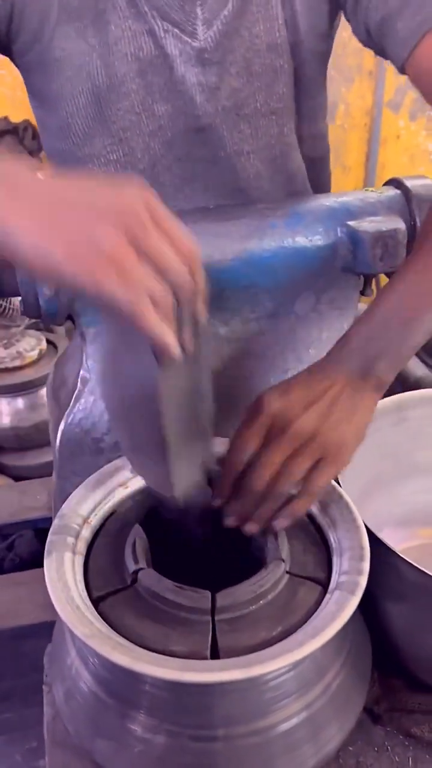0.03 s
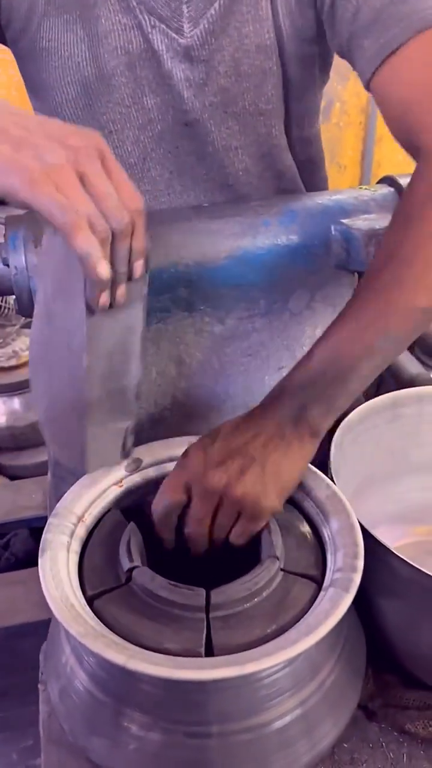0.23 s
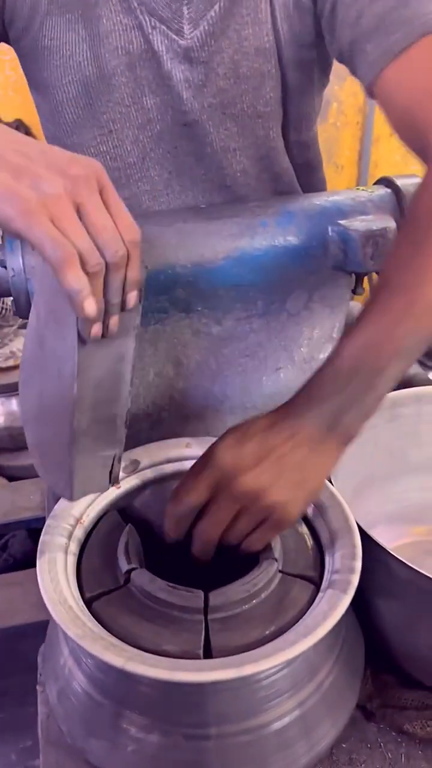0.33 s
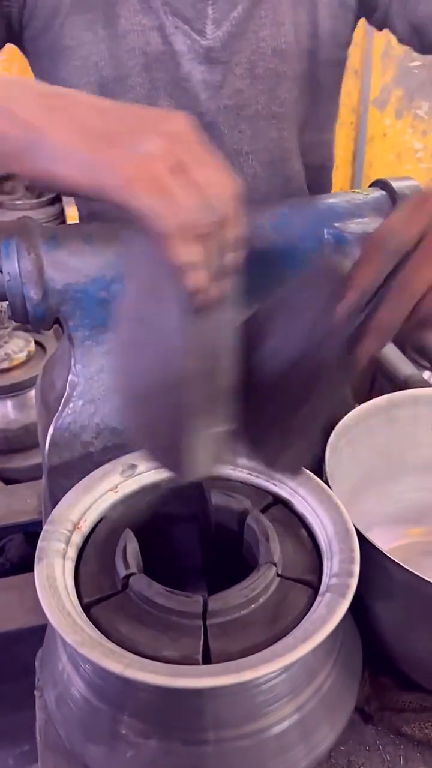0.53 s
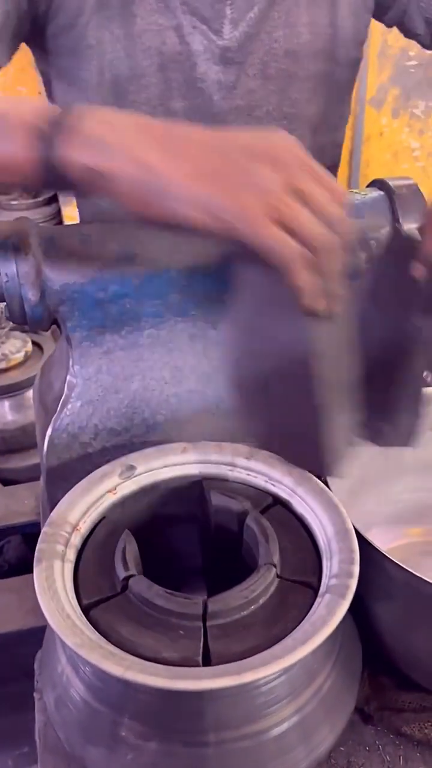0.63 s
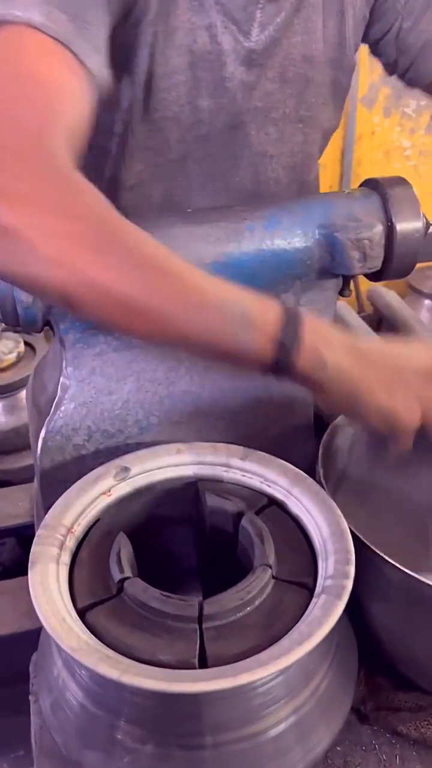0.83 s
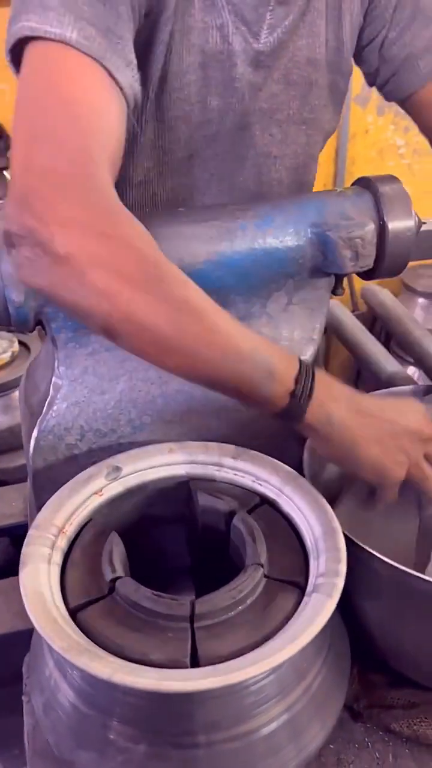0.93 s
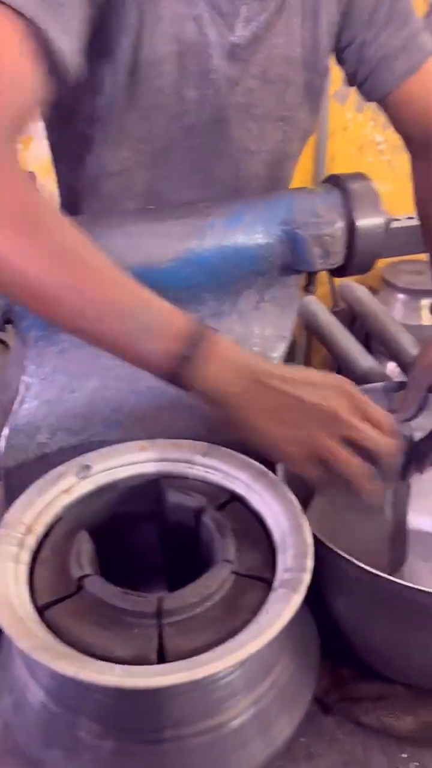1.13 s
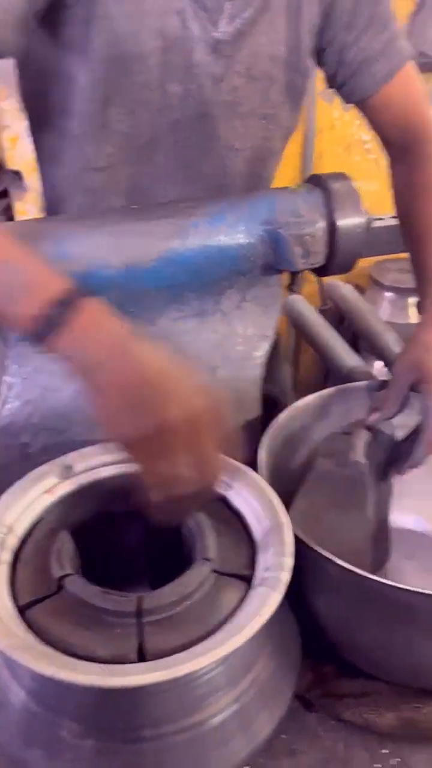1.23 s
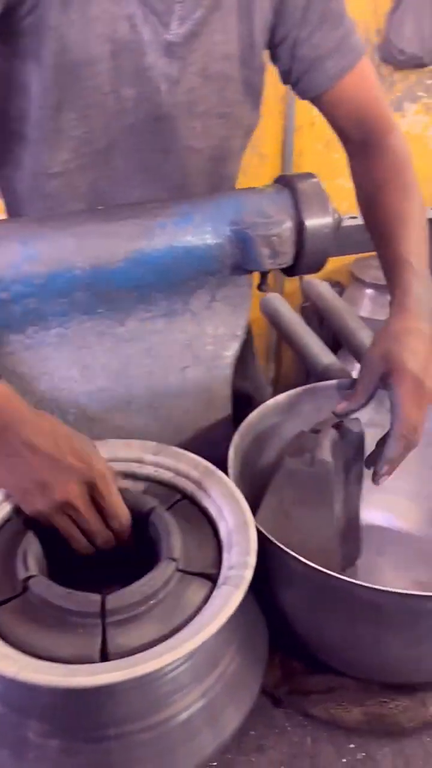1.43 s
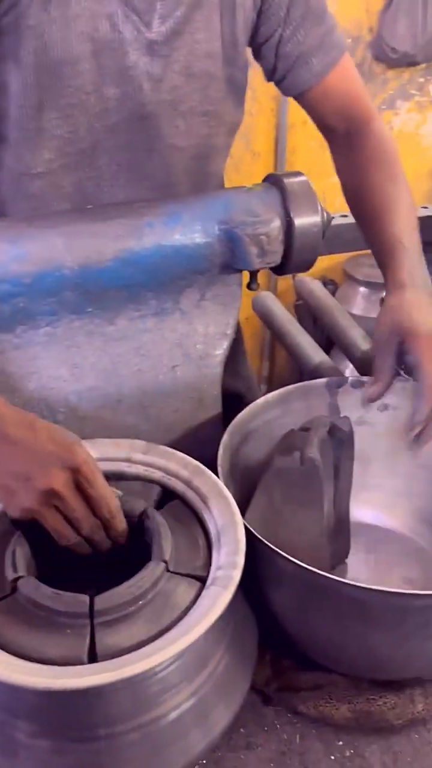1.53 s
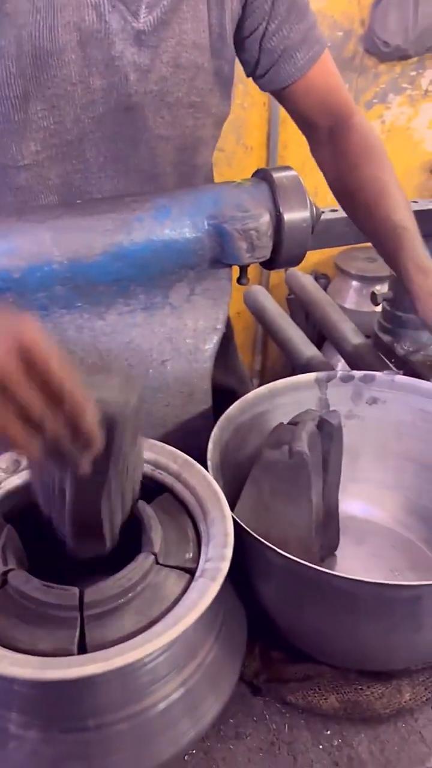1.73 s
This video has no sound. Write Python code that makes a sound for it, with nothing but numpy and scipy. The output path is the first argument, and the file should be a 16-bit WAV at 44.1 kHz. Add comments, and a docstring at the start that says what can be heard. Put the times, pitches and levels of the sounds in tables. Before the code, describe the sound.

Metal mould pieces clink and clank, then knock a thin basin that booms hollowly over machine drone

```python
"""Metal clinks high and short, then a thin basin booms as mould pieces lifted out of a can are set down in it.
The place is a workshop: grit scrapes on the metal and machines drone behind. Close sounds also excite the room.
Pieces and basin are struck modes, knocks are damped rough notes, scrapes and drone are shaped noise, and
steady tones hum. The stereo image changes with pitch: some bands sit in the middle, others are opposite
in left and right."""
import sys
import numpy as np
from scipy import signal
from scipy.fft import rfft, irfft
from scipy.io import wavfile
from scipy.ndimage import uniform_filter1d

SR = 44100
rng = np.random.default_rng(int(sys.argv[2]) if len(sys.argv) > 2 else 0)


def persist_wave(psi):
    """Save psi, clipped to +-1, as 16-bit WAV."""
    counts = np.round(np.clip(psi, -1, 1) * 32767).astype(np.int16)
    wavfile.write(sys.argv[1], SR, np.atleast_2d(counts).T)


N = 79380  # samples, 1.8 s


def undb(db):
    """Turn decibels into an amplitude factor."""
    return 10 ** (np.asarray(db) / 20)


def decay(t, t60):
    """Exponential decay that falls 60 dB in t60 seconds."""
    return np.exp(-np.log(1000) * t / t60)


def shape(x, gain):
    """Filter by a gain given as a function of Hz."""
    n = x.shape[-1]
    hz = np.arange(n // 2 + 1) * SR / n + 1e-3
    return irfft(rfft(x) * gain(hz), n)


def add(out, x, start_s):
    """Mix a sound with mid and side rows into the scene, cut off where the scene ends."""
    i = int(max(start_s, 0) * SR)
    out[:, i:i + x.shape[1]] += x[:, :N - i]


def walk(rate):
    """Wander between random levels held 1 / rate s and slewed twice."""
    hold = int(SR / rate)
    steps = np.repeat(rng.standard_normal(N // hold + 1), hold)
    return 1.78 * uniform_filter1d(uniform_filter1d(steps, hold), hold)[:N]


CHATTER = .5  # weight of the chatter against a hard first blow
CONTACT_S = .001  # rise time of a struck note
SLIDE_S = .02  # a contact that chatters this long has little hard first blow


def strike(hz, db, t60, blows, scatter_db, right=0.):
    """Each blow is a contact with a burst of chatter that sets all modes ringing, in mid and side parts."""
    out, t = np.zeros((2, N)), np.arange(SR // 3) / SR
    edges = np.minimum(np.minimum(t / CONTACT_S, 20 * (t[-1] - t)), 1)
    fade = decay(t, np.maximum(t60, .01)[:, None]) * edges
    for start_s, level_db, tilt_db, chatter_s in blows:
        scatter = scatter_db * rng.standard_normal(len(hz))
        gain = undb(db + tilt_db * np.log2(hz / 580.0) + scatter)
        pitch = (hz * rng.normal(1, .004, len(hz)))[:, None]

        def ringing():
            cycles = pitch * t + rng.random((len(hz), 1))  # random phase for each mode
            return gain @ (fade * np.sin(2 * np.pi * cycles))

        mid, other = ringing(), ringing()
        age = t[:SR // 8] / max(chatter_s, 1e-4)
        # cubed noise gives sparse, uneven contacts
        burst = rng.standard_normal(SR // 8) ** 3 * np.minimum(3 * age, 1) * np.exp(-age)
        burst = CHATTER * burst / np.sqrt(np.sum(burst ** 2))
        burst[0] = np.exp(-(chatter_s / SLIDE_S) ** 2)  # the hard first blow
        burst /= np.sqrt(np.sum(burst ** 2))
        # taking the mid part out of the side part leans the sound to the right
        side = np.sqrt(1 - right ** 2) * other - right * mid
        ring = signal.fftconvolve(np.array([mid, side]), burst[None], axes=1)
        add(out, ring * undb(level_db) / np.sqrt(np.sum(undb(db) ** 2)), start_s)
    return out


# Modes of a mould piece, before scatter: pitch_hz, level_db, t60_s
PIECE_MODES = [(2350, 6.5, 0.099), (2466, 7, 0.089), (2807, -6, 0.12), (3320, -10, 0.11), (4080, -29, 0.19),
               (4610, -11, 0.16), (4960, -8, 0.046), (6547, 0.5, 0.22), (7580, -14, 0.16), (8840, 1, 0.19),
               (11100, -26, 0.042)]
# How far the close partials of each mode spread: spread_hz
PIECE_SPREAD = [35, 70, 70, 120, 250, 250, 300, 150, 450, 650, 1300]
# Clinks of the pieces: start_s, level_db, tilt_db (per octave), chatter_s, tick_db
CLINKS = [(.003, -20.5, -1, 0.018, -38), (0.219, -9.5, -0.5, .003, -7.5), (0.2311, -23, 0, 0.0034, -21),
          (0.364, -21, -11, 0.0049, -21), (.393, -13, 0.5, 0.01, -16), (0.4621, -5, -1, 0.0038, -25),
          (0.5202, -14, 1, 0.016, -10.5), (0.6915, -9, -1, 0.0019, -6.5), (0.7489, -18, -12, 0.0026, -12.5),
          (1.175, -38.5, 4.5, 0.026, -45), (1.2205, -34, 2.5, 0.029, -23.5), (1.27, -38, 3, 0.043, -45),
          (1.32, -41, 2, 0.035, -45), (1.6242, -25.5, 1.5, 0.019, -32)]
PARTIALS = 22  # in the knot of each mode
TICK_HZ, TICK_T60_S = 2525, 0.03  # the short bright note that opens a clink
SPLASH_DB, SPLASH_S = -1.5, 0.04  # hiss of countless high modes; its decay time grows with the chatter


def pieces():
    """Every mode of a piece is a dense knot of close partials; a tick and a splash of hiss open each clink."""
    hz, db, t60 = np.repeat(np.array(PIECE_MODES), PARTIALS, axis=0).T
    t60 = t60 * rng.uniform(.6, 1.3, len(hz))
    place = np.tile(np.linspace(-1.3, 1.3, PARTIALS), len(PIECE_MODES))
    place = place + rng.uniform(-1, 1, len(hz)) / 15  # uneven spacing in the knot
    knot_hz = hz + np.repeat(PIECE_SPREAD, PARTIALS) * place
    knot_db = db - 8 * place ** 2  # outer partials are weaker
    out = strike(knot_hz, knot_db, t60, np.array(CLINKS)[:, :4], scatter_db=2.5)

    t = np.arange(SR // 5) / SR
    tick = np.sin(2 * np.pi * TICK_HZ * t) * decay(t, TICK_T60_S) * np.minimum(t / CONTACT_S, 1)
    for start_s, level_db, _, chatter_s, tick_db in CLINKS:
        hiss = rng.standard_normal((2, len(t))) * np.exp(-t / (SPLASH_S + chatter_s))
        hiss = shape(hiss, lambda f: f / (f + 1000.) / (1 + (f / 3000.0) ** 2))
        add(out, undb(level_db + SPLASH_DB) * hiss + undb(tick_db) * tick, start_s)
    return out


# Dull knocks of damped metal: start_s, level_db, pitch_hz, t60_s, crack_db
KNOCKS = [(0.3316, -11.5, 1473, 0.037, -3), (.694, -19.5, 1466, 0.091, -28),
          (.338, -8.5, 304.6, 0.057, -23), (.341, -11, 507, 0.028, -9), (.427, -13.5, 1384, 0.026, -13),
          (.433, -11, 247, 0.033, -17), (.4375, -6, 298, 0.017, -20), (0.527, -23, 1010, 0.18, -6.5),
          (.529, -14.5, 1387, 0.043, -4), (.536, -16, 1434, 0.059, -4.5), (.397, -14.5, 494, 0.059, -33),
          (.472, -18.5, 1017, 0.043, -5), (.501, -20, 1320, 0.018, -5.5), (.7775, -10, 794, 0.02, -4),
          (.778, -12, 577, 0.063, -27), (.7822, -11.5, 740, 0.047, -15), (.7885, -8, 820, 0.017, -14),
          (.7905, -15, 1150, 0.014, -3), (.807, -17.5, 405, 0.03, -30), (.858, -12.5, 2960, 0.063, -28),
          (.866, -10, 760, 0.047, -19), (.8745, -6.5, 257, 0.032, -30), (.893, -12, 300, 0.019, -12),
          (0.9162, 4.5, 1230, 0.0084, -3), (.9195, -8, 2530, 0.015, 4), (.9315, -9, 2290, 0.017, -27),
          (.934, -1, 605, 0.022, -34), (.9425, -2, 1535, 0.016, -2.5), (0.96, -10.5, 1360, 0.031, -24),
          (.995, -26, 1350, 0.091, -24), (1.0375, -19, 2000, 0.14, -26), (1.097, -27, 1442, 0.15, -37),
          (1.3603, -23.5, 1960, 0.095, -35), (1.4461, -24.5, 1973, 0.074, -33),
          (1.472, -10.5, 346, 0.036, -48), (1.484, -15.5, 340, 0.082, -45), (1.506, -26, 1050, 0.086, -33),
          (1.631, -27.5, 1456, 0.18, -40), (0.786, -20, 1480, 0.051, -13)]
CRACK_S = .003  # decay time of the crack


def knocks():
    """Damped metal gives a short, rough note, fed to mid and inverted to side, with a dull crack of noise."""
    out, t = np.zeros((2, N)), np.arange(SR // 5) / SR
    for start_s, level_db, pitch_hz, t60, crack_db in KNOCKS:
        rough = 1 + 3 * shape(rng.standard_normal(len(t)), lambda f: f < pitch_hz / 8)
        note = rough * np.sin(2 * np.pi * pitch_hz * t) * decay(t, t60) * np.minimum(t / 0.0015, 1)
        crack = undb(crack_db) * rng.standard_normal((2, len(t))) * np.exp(-t / CRACK_S)
        crack = shape(crack, lambda f: 1 / (1 + (f / 1600.0) ** 4))
        add(out, undb(level_db) * note * np.array([[1], [-1]]) + crack, start_s)
    return out


# Lesser modes of the basin, the middle of each pair: pitch_hz, level_db, t60_s
BASIN_MODES = [(134.4, -5.5, 0.21), (197, -11, 0.18), (244, 0, 0.17), (323, -1.5, 0.22), (373.5, 1, 0.15),
               (402.6, -1.5, 0.1), (533, -8, 0.69), (572, 3.5, 0.04), (804, -12.5, 0.41),
               (995, -12.5, 0.49), (1465, -9, 0.42)]
# Blows on the basin: start_s, level_db, tilt_db (per octave), chatter_s
BLOWS = [(0.866, -13, 0.5, 0.005), (0.921, -13.5, -2.5, 0.0083), (0.938, -10, -5, 0.017),
         (0.961, -9, -4.5, 0.018), (1.0387, -9.5, -4.5, 0.017), (1.074, -16, 6, 0.014),
         (1.1, -12, -4.5, 0.014), (1.361, -14.5, -0.5, 0.014), (1.41, -22, -1, 0.011),
         (1.4454, -20.5, -4, 0.013), (1.472, -21, -3.5, 0.0078), (1.51, -26, -8, 0.016)]
# Main mode driven by pieces that rock against the wall, one curve a boom, before smoothing: time_s, level_db (rms)
BOOM_CURVES = [
    [(0.928, -37), (0.94, -15), (0.954, -14), (0.968, -9.5), (0.982, -37), (0.993, -27), (1.005, -27),
     (1.022, -12)],
    [(1.03, -18), (1.044, -17.5), (1.06, -9.5), (1.07, -8), (1.08, -7.5), (1.1, -10), (1.116, -14),
     (1.124, -18), (1.138, -13), (1.15, -31), (1.168, -25), (1.185, -20), (1.195, -33), (1.21, -17.5),
     (1.228, -55), (1.242, -25), (1.27, -36)],
    [(1.34, -45), (1.372, -24), (1.39, -18), (1.41, -34), (1.438, -27), (1.482, -33), (1.502, -40),
     (1.52, -23.5), (1.55, -30), (1.586, -55)],
]
# Middle pitch of each boom, as the load on the wall changes: pitch_hz
BOOM_PITCHES = [291.8, 284, 303.5]
BOOM_WAVER = .01  # scale of the pitch waver, as a fraction of the pitch
BASIN_RIGHT = .7  # lean of the blows to the right, 0 to 1


def basin():
    """Blows ring the lesser modes, each a rough pair; the main one booms and flutters on its own curves."""
    hz, db, t60 = np.repeat(np.array(BASIN_MODES), 2, axis=0).T
    pairs_hz = hz * (1 + 0.0213 * np.tile([-1, 1], len(BASIN_MODES)))
    ring = strike(pairs_hz, db, t60, BLOWS, scatter_db=2.5, right=BASIN_RIGHT)

    t = np.arange(N) / SR
    flutter = undb(1.2 * walk(80))
    wavering_s = np.cumsum(1 + BOOM_WAVER * walk(39.1)) / SR  # time that runs unevenly
    boom = np.zeros(N)
    for curve, pitch_hz in zip(BOOM_CURVES, BOOM_PITCHES):
        time_s, level_db = np.array(curve).T
        level = undb(np.interp(t, time_s, level_db, left=-90, right=-90))
        level = shape(level, lambda f: np.exp(-(f / 120) ** 2))  # round the corners
        boom += level * np.sin(2 * np.pi * pitch_hz * wavering_s)
    return ring + np.sqrt(2) * flutter * boom * np.array([[1], [-1]])


# Grit scraping on metal: start_s, length_s, level_db, tilt_db (per octave), release_s
SCRAPES = [(0.3296, 0.0066, -23.5, -1, 0.019), (0.355, 0.01, -27, -5, 0.0073),
           (0.372, 0.0058, -27.5, -2, 0.0059), (0.424, 0.0097, -26, -6.5, 0.01),
           (0.771, 0.028, -30.5, 1.5, 0.026), (0.855, 0.009, -16.5, 2.5, 0.026),
           (0.9165, 0.0057, -18, 1.5, 0.016), (0.928, 0.0072, -24.5, -4, .008),
           (0.941, 0.016, -21, 3, 0.017), (0.963, 0.015, -24, 0.5, 0.078),
           (1.033, 0.0089, -22, -1.5, 0.051), (1.359, 0.027, -34, -2.5, 0.029),
           (1.445, 0.029, -33.5, -2, 0.055), (1.634, 0.077, -34.5, -4.5, 0.0098)]
# High resonances of the scraped metal, before scatter: pitch_hz, width_hz, level_db (over the hiss)
RASP = [(1966, 69, -9), (2864, 240, 5), (3570, 100, 7), (4120, 57, 9), (4900, 470, -0.5), (5460, 430, 3),
        (7020, 150, -2.5), (8000, 120, -9), (8860, 230, 1.5)]
GRIT_DB, STUTTER_DB = 2.5, 1.5  # unevenness of single grains and of the slower stutter


def scrapes():
    """Grainy, stuttering hiss rings the metal's high resonances, with a sudden start and a short release."""
    out, t = np.zeros((2, N)), np.arange(SR // 2) / SR
    stutter = undb(STUTTER_DB * walk(250))
    for start_s, length_s, level_db, tilt_db, release_s in SCRAPES:
        grit = rng.standard_normal((2, len(t))) * undb(GRIT_DB * rng.exponential(size=len(t)))
        peaks = [(hz * rng.normal(1, .01), width, db + rng.normal(0, 2)) for hz, width, db in RASP]

        def colour(f):
            rasp = 1 + sum(undb(db) / (1 + 1j * (f - hz) / (width / 2)) for hz, width, db in peaks)
            tilt = undb(tilt_db * np.log2(f / 2000.))
            band = f / (f + 1400.0) / (1 + (f / 4340.0) ** 2) / (1 + (f / 15400.0) ** 6)
            return rasp * tilt * band

        grit = shape(grit, colour)
        release = np.exp(-np.maximum(t - length_s, 0) / release_s)
        add(out, grit / grit.std() * undb(level_db) * release, start_s)
    return out * stutter


# Spectrum of the machine drone, only its shape counts: pitch_hz, level_db (per Hz)
DRONE = [(20, -94), (32, -44), (54, -49.5), (70, -50.5), (120, -52), (200, -54.5), (300, -53.5), (800, -63),
         (1100, -65), (1600, -65.5), (2600, -72.5), (3300, -74), (5000, -76.5), (6500, -82), (7500, -80),
         (9000, -84), (10000, -83.5), (16000, -99)]
# Thin steady machine tones: pitch_hz, level_db (rms)
HUM = [(748, -40.5), (846, -43)]
DRONE_DB = -25.5  # drone level before swell and flicker
SWELL_DB, FLICKER_DB = .6, 1.2  # scale of the common swell and of each band's own flicker


def machines():
    """Half-octave bands of noise swell together and flicker alone, with thin steady tones."""
    hz, db = np.array(DRONE).T
    noise = shape(rng.standard_normal((2, N)), lambda f: undb(np.interp(np.log(f), np.log(hz), db)))
    drone, swell = 0, walk(1.26)
    for octave in np.arange(0, 10.5, .5):  # octaves above 20 Hz
        band = shape(noise, lambda f: np.clip(1 - 2 * abs(np.log2(f / 20) - octave), 0, 1))
        drone = drone + band * undb(SWELL_DB * swell + FLICKER_DB * walk(11.47))
    t, hum = np.arange(N) / SR, 0
    for pitch_hz, level_db in HUM:
        cycles = pitch_hz * t + 0.033 * walk(8.2)  # slight phase wander
        hum = hum + undb(level_db) * np.sqrt(2) * np.sin(2 * np.pi * cycles)
    return drone / noise[0].std() * undb(DRONE_DB) + hum


ROOM_DB, ROOM_T60_S = -10, 0.24
ROOM_HZ, ROOM_LOW_HZ = 4570, 477  # the tail thins out above and below these


def room(near):
    """The workshop answers close sounds with a diffuse tail of decaying noise."""
    t = np.arange(SR // 2) / SR
    tail = rng.standard_normal((2, len(t))) * decay(t, ROOM_T60_S) * np.minimum(t / 0.011, 1)
    tail = shape(tail, lambda f: 1 / (1 + f / ROOM_HZ) / (1 + ROOM_LOW_HZ / f))
    tail = tail / np.sqrt(np.sum(tail ** 2, axis=1, keepdims=True))
    return undb(ROOM_DB) * signal.fftconvolve(near, tail, axes=1)[:, :N]


def scene():
    """Rows: mid, the same in left and right, and side, opposite in left and right."""
    near = pieces() + knocks() + basin() + scrapes()
    return near + room(near) + machines()


# Stereo image by pitch, level of side over mid: pitch_hz, level_db
SIDE_OVER_MID = [(0, -25), (90, -51), (170, -25), (300, -11.5), (800, -3.5), (1500, -10), (1850, -6),
                 (2200, -3), (2600, 5), (3200, 4.5), (5300, -5), (5700, 35), (6250, 28), (6500, 5.5),
                 (7000, -1), (7600, -5), (8000, -9), (8400, -1.5), (9300, -18), (9600, 1.5), (10000, 0),
                 (12800, -2.5), (13200, 6), (13900, 20), (14300, 25), (14800, -34)]
BASS_CUT_HZ, TOP_HZ = 52.5, 15700
CEILING = 1.8  # amplitude where peaks flatten out


def record(dry):
    """Mid and side are weighed by pitch into left and right; mid bass is cut, peaks rounded, the top cut."""
    hz, db = np.array(SIDE_OVER_MID).T

    def mid_gain(f):
        bass_cut = 1 / np.sqrt(1 + (BASS_CUT_HZ / f) ** 6)
        return bass_cut / np.sqrt(1 + undb(np.interp(f, hz, db)) ** 2)

    def side_gain(f):
        return 1 / np.sqrt(1 + undb(-np.interp(f, hz, db)) ** 2)

    mid, side = shape(dry[0], mid_gain), shape(dry[1], side_gain)
    out = CEILING * np.tanh(np.array([mid + side, mid - side]) / CEILING)
    top_cut = signal.ellip(12, .2, 90, TOP_HZ, fs=SR, output="sos")
    return signal.sosfilt(top_cut, out)


dry = scene()
out = record(dry)
persist_wave(out)
```